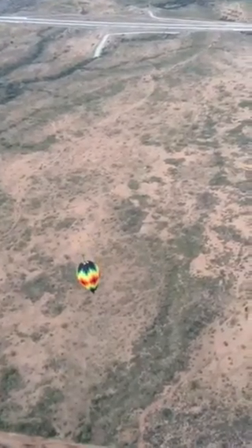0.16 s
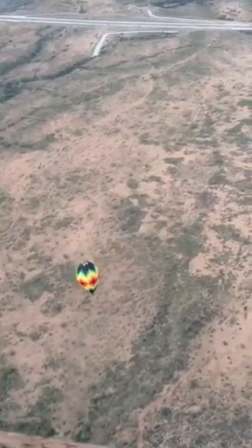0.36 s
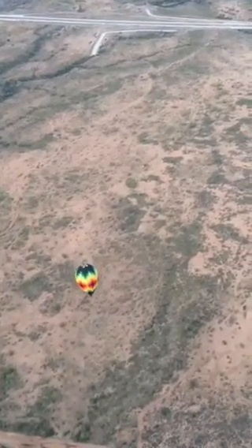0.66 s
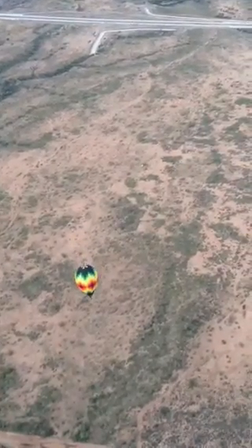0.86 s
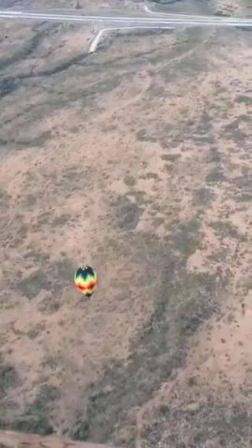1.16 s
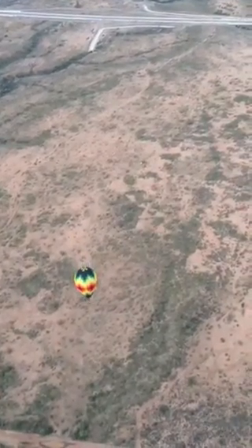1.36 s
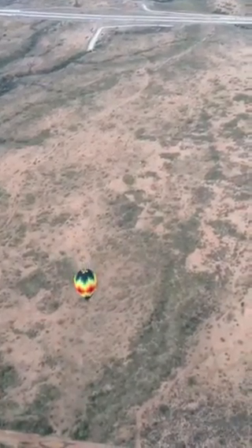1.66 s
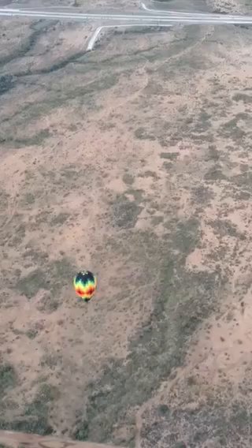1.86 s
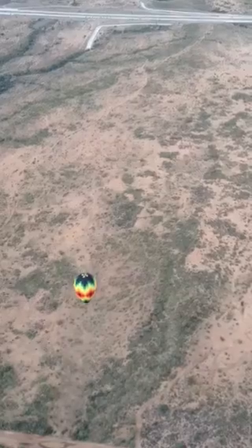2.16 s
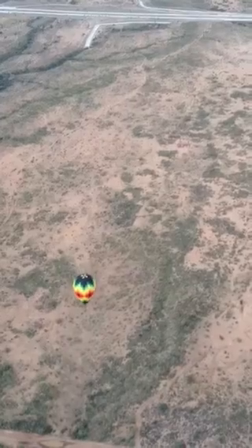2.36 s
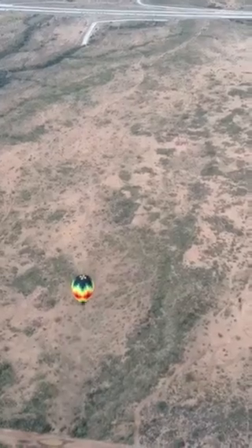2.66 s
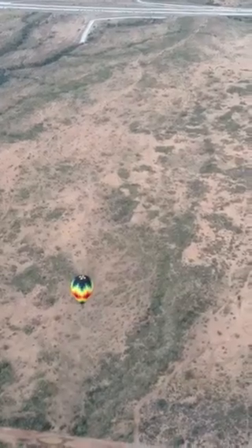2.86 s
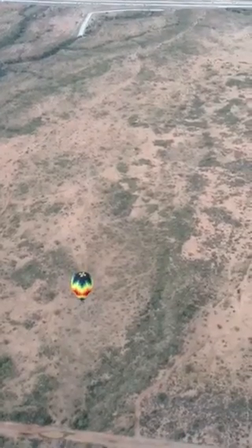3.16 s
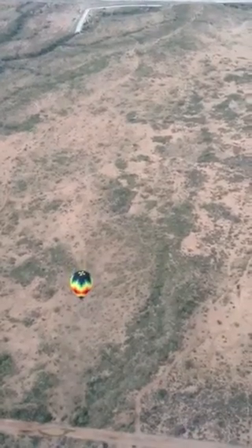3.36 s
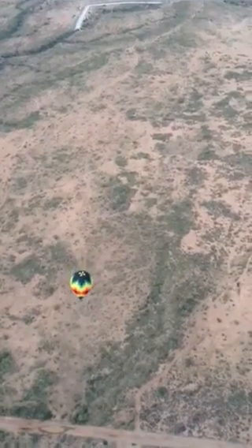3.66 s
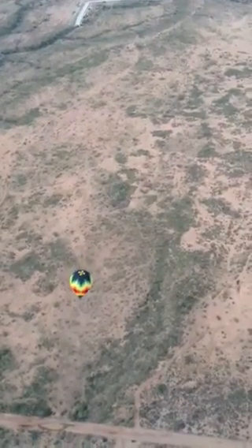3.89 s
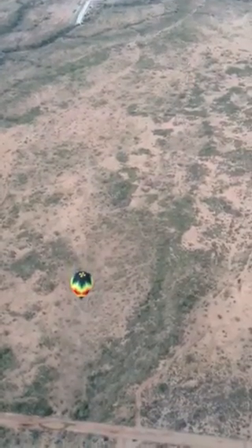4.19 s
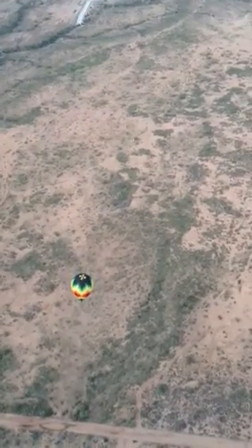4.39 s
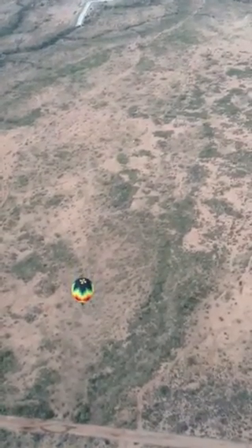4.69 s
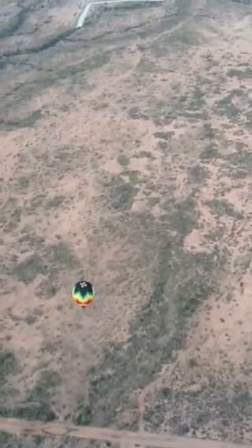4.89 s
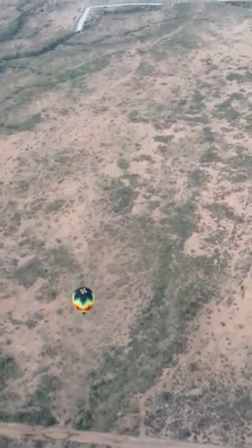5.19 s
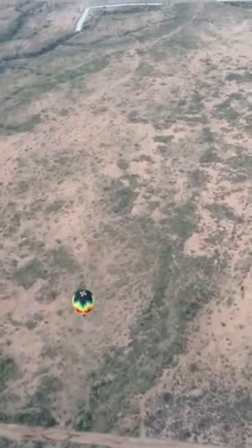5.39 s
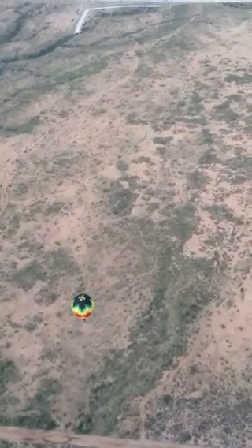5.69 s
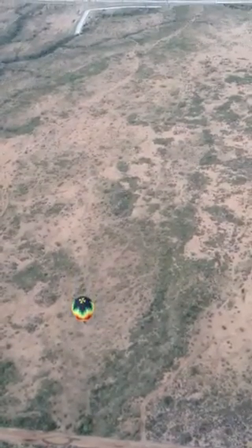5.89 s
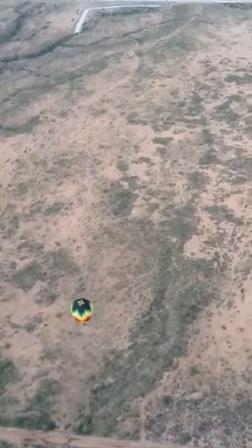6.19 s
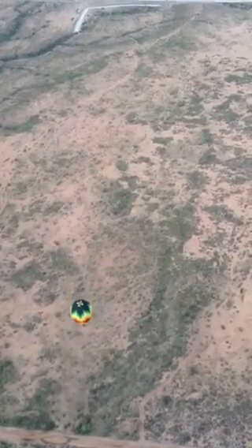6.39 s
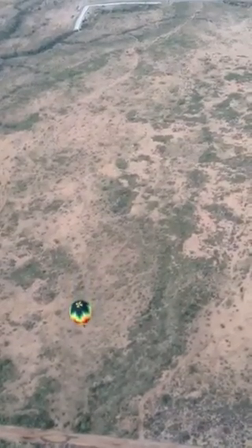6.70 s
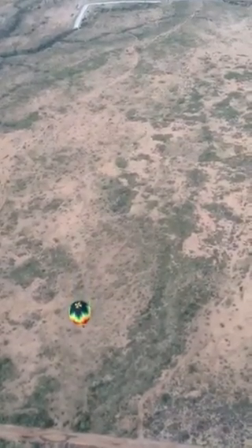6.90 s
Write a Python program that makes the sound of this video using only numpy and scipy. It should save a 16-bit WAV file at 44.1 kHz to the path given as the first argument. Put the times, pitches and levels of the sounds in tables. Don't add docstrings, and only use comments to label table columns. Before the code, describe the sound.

A faint pilot flame flutters, then a balloon burner thumps alight and roars with tearing gas hiss for three seconds before cutting off abruptly.

```python
import sys
import numpy as np
from scipy import signal
from scipy.fft import rfft, irfft
from scipy.io import wavfile
from scipy.ndimage import uniform_filter1d

SR = 44100
rng = np.random.default_rng(int(sys.argv[2]) if len(sys.argv) > 2 else 0)


def how_loud(loudness_db):
    steps = np.asarray(loudness_db, float) / 20
    return 10 ** steps


def to_wav(sig):
    pcm = np.clip(np.atleast_2d(sig), -1, 1) * 32767
    pcm = np.round(pcm).astype(np.int16)
    wavfile.write(sys.argv[1], SR, pcm.T)


N = 310766

# time_s, firing_hz, level_db, late_timbre_share
ENGINE_GLIDE = [
    (0, 124.4, -75, 0),
    (1.5, 129.6, -67, 0),
    (1.9, 135.5, -67, 0.1),
    (2.1, 137, -61.5, 0),
    (2.35, 138.4, -63.5, 0.07),
    (2.6, 141, -63, 0),
    (5.8, 150, -58, 0.94),
    (6.4, 149.1, -57, 0.8),
    (7.05, 149, -60, .999),
]
# firing_rate_multiple, early_db, late_db
ENGINE_ORDERS = [(1, -10.5, -12), (2, 4, -0.5), (3, -20, -4), (3.5, -18.5, -13.5), (4, -1, -14),
                 (5, -13, -19)]

# freq_hz, density_db
CLOTH_COLOUR = [(120, -49), (300, -15), (700, -5), (1500, -8), (2500, -11), (4500, -8), (6000, -15),
                (8000, -14), (11000, -22), (15300, -25)]

# start_s, peak_db, thing_touched
TICKS = [(.1785, -44, "wicker"), (.329, -47, "tube"), (.553, -53, "strap"), (.573, -52, "strap"),
         (.855, -54, "wicker"), (1.14, -49, "wicker"), (1.198, -39.5, "clasp"), (1.716, -48, "wicker"),
         (2.1, -50, "cane"), (5.841, -51, "lever"), (5.853, -52, "lever"), (6.445, -56, "wicker"),
         (6.635, -53, "wicker"), (6.804, -56, "wicker"), (6.898, -52.5, "cane"), (7.035, -55, "wicker")]
TOUCHED_RINGS = { "wicker": [(9000, 8000, 0, .027)], "cane": [(4400, 2000, 4, .017)],
                 "tube": [(1860, 117, 0, .1)], "strap": [(1250, 500, -1, .11), (1300, 900, -9, 0.78)],
                 "clasp": [(8000, 11000, -1, 0.054), (3760, 700, 2, .043), (4700, 500, -5, .044),
                 (2500, 500, -12, .03), (9700, 810, -13, .07), (3250, 200, -13, .14)],
                 "lever": [(10000, 9300, 3.5, 0.078), (3800, 250, -6, .12), (5700, 300, -8, .07),
                 (7700, 300, -8, .12), (10000, 400, -11, .09), (11900, 400, -9, .09),
                 (14500, 600, -8, .09)], }

# time_s, size_db, second_group_pitch_factor
PILOT_FLAME = [
    (0, 0, 1.001),
    (2.57, 0, 1.013),
    (5.75, -5.5, 0.99),
    (5.92, -3, 0.98),
    (6.1, -3, 0.93),
    (6.3, -1.5, 0.93),
    (6.47, -0.7, .93),
    (6.53, -2, 0.99),
    (7.05, -1.2, 1.005),
]
# level_db, size_share, db_per_unit_pitch
PILOT_LAYERS = [
    (-51.5, 1.3, -1),
    (-68, 1.2, 1),
    (-63, 0.905, 80),
    (-71.5, .8, 25),
]
# centre_hz, width_hz, level_db
TUBE_TONES = [
    [(1878, 140, 0.5), (2140, 150, -6)],
    [(3438, 110, -1), (3850, 340, 2), (4440, 98, -13.5)],
    [(5390, 180, 1), (6570, 300, -4), (7600, 720, 4.5), (9530, 250, -4), (11600, 820, 2.5),
     (12270, 500, -3), (13550, 600, -2), (14500, 1000, -2.5)],
]
# freq_hz, density_db
FLUTTER_COLOUR = [(30, -73.5), (55, -43), (80, -22.5), (110, -10), (160, -1.5), (210, -1.5), (260, -4.5),
                  (330, -7), (410, -14.5), (500, -12.5), (700, -13), (1080, -24.5), (1500, -38.5),
                  (2200, -61)]
# freq_hz, density_db
FIZZ_COLOUR = [(200, -59.5), (700, -21), (1500, -2), (2800, -2), (4600, -0.5), (6000, -6.5), (9000, -7.5),
               (10500, -11), (13000, -16), (15300, -13)]

# start_s, peak_db, low_bump_db, dip_after_db
SURGES = [(2.776, -12.5, -29, -1), (2.859, -8.5, -35, -1.5), (3.151, -12, -41.5, -0.5),
          (3.2163, -6.5, -26, -4), (3.49, -9, -34, -0.4), (3.62, -5.5, -38, -2.5), (3.752, -5, -43.5, -2),
          (3.964, -6, -39, -3), (4.45, -5, -38, -4), (4.734, -4.5, -39.5, -2), (5.173, -5, -41, 1.6),
          (5.275, -9, -38, -1.5)]
# start_s, peak_db, low_bump_db, pitch_hz, t60_s
POPS = [
    (2.5985, -30, -60, 300, .05),
    (2.6045, -16, -50, 480, .04),
    (2.6093, -9, -45, 470, .03),
    (2.6155, 0, -26, 232, .075),
    (5.687, -10, -70, 260, .04),
    (5.748, -32, -70, 240, .07),
    (5.77, -35, -70, 260, .04),
    (5.786, -37, -70, 200, .1),
    (5.82, -39, -70, 200, .2),
]

# time_s, gas_pressure_db, flame_size_db
VALVE = [
    (2.7, .5, 3.5),
    (3.05, 1.5, 1.5),
    (3.6, -0.5, -0.5),
    (3.9, 1.5, 0),
    (4.7, 2, -1),
    (5.1, -2, 1),
    (5.35, -6, .5),
    (5.58, -11.5, -0.5),
    (5.685, -20, -3),
]
# level_db, pressure_share, size_share, dip_share, shut_fall_db_per_s
BURNER_LAYERS = [
    (-17, 0.13, 0.97, 0.73, 225),
    (-28, 0.18, 0.79, 1.1, 284),
    (-29, 0.61, .05, .9, 380),
    (-22, 0.92, .05, 0.81, 440),
]
# freq_hz, density_db
FLAME_COLOUR = [(25, -69.5), (55, -50.5), (75, -38), (100, -18.5), (130, -10.5), (165, -0.5), (195, -1),
                (235, 1), (290, -3), (350, -6.5), (460, -11.5), (590, -10.5), (700, -22), (980, -41.5)]
UPPER_FLAME_COLOUR = [(410, -21.5), (700, -2), (907, 0), (1020, -3), (1290, 1), (1690, -9.5), (1900, -11.5),
                      (2470, -36), (4180, -120)]
LOWER_JET_COLOUR = [(1500, -22.5), (1750, -6.5), (2000, -5.5), (2600, -4), (3200, -6.5), (3700, -2.5),
                    (4300, -1), (5100, -3), (5550, -7.5), (6000, -23)]
JET_COLOUR = [(5200, -36.5), (5650, -9.5), (6300, -2.5), (6800, -3.5), (7500, 0.5), (9000, 0), (11200, 0),
              (13000, 0.5), (15300, -3.5), (16000, -5.5)]

# centre_s, low_hz, high_hz
SPLITS = [(1.3, 5700, 7000), (1.3, 9000, 10400), (3.37, 9600, 11200), (3.98, 13100, 15300),
          (4.3, 5700, 7000), (4.84, 4200, 5300), (4.84, 6900, 10500), (4.84, 13800, 15300),
          (4.863, 5200, 7700), (4.91, 9600, 11200), (4.91, 11700, 13200), (5.42, 6900, 8400),
          (5.465, 6300, 9100), (6.25, 7000, 8400), (6.25, 9000, 10500)]

OPEN_S, SHUT_S = 2.59, 5.685
SNAP_DB, SNAP_S = (-30, -39, -28, -15), 0.0086
SWELL_DB, SWELL_S = (-1.5, -2.5, -4.5, -14.5), 0.039


def evened(x):
    return x / np.sqrt(np.mean(x ** 2) + 1e-20)


def columns(table):
    time_s, *values = np.transpose(table)
    return [np.interp(np.arange(N) / SR, time_s, v) for v in values]


def add(mix, start_s, sound):
    part = mix[round(start_s * SR):][:len(sound)]
    part += sound[:len(part)]


def resonate(x, hz, width_hz):
    turn = np.exp(2j * np.pi * np.cumsum(hz * np.ones(len(x))) / SR)
    r = np.exp(-np.pi * width_hz / SR)
    return 2 * (turn * signal.lfilter([1 - r], [1, -r], x / turn)).real


def ringing_band(noise, hz, width_hz):
    return evened(resonate(resonate(noise, hz, width_hz), hz, width_hz))


def turbulence(colour, patchy_db, flicker_db, size=1024):
    frames = 4 * N // size + 5
    hz = np.fft.rfftfreq(size, 1 / SR)
    a, b, patches = rng.standard_normal((frames, len(hz), 3)).T
    patches = uniform_filter1d(patches, size=size // 100, axis=0)
    patches = evened(uniform_filter1d(patches, size=8, axis=1))
    flicker = evened(uniform_filter1d(rng.standard_normal(frames), size=3))
    colour_hz, density_db = np.transpose(colour)
    colour_db = np.interp(np.log(hz + 1), np.log(colour_hz + 1), density_db)[:, None]
    z = (a + 1j * b) * how_loud(colour_db + patchy_db * patches + flicker_db * flicker)
    return evened(signal.istft(z, nperseg=size, noverlap=3 * size // 4)[1][:N])


def engine():
    firing_hz, level_db, late = columns(ENGINE_GLIDE)
    turns = np.cumsum(firing_hz) / SR
    late = np.clip(late, 0, 1)
    out = np.zeros(N)
    for multiple, early_db, late_db in ENGINE_ORDERS:
        waver_db = 2.6 * evened(uniform_filter1d(rng.standard_normal(N), size=4000))
        order_db = level_db + early_db + late * (late_db - early_db) + waver_db
        out += how_loud(order_db) * np.sqrt(2) * np.sin(2 * np.pi * multiple * turns)
    return out


def sleeve():
    t = np.arange(N) / SR - 2.12
    hold_s, slope_db_per_s = 0.1, 250
    level_db = -58.5 - slope_db_per_s * (np.maximum(-t, 0) + np.maximum(t - hold_s, 0))
    return how_loud(level_db) * turbulence(CLOTH_COLOUR, patchy_db=1.5, flicker_db=2.0, size=512)


def ticks():
    out = np.zeros(N)
    t = np.arange(SR // 3) / SR
    attack = 1 - np.exp(-t / 0.00051)
    for start_s, peak_db, thing in TICKS:
        noise = rng.standard_normal(len(t))
        for hz, width_hz, part_db, t60_s in TOUCHED_RINGS[thing]:
            decay = how_loud(peak_db + part_db - 6.0 - 60 * t / t60_s)
            add(out, start_s, decay * attack * ringing_band(noise, hz, width_hz))
    return out


def pilot():
    size_db, pitch = columns(PILOT_FLAME)
    flutter_db, *tones_db = [db + share * size_db + sag_db * (pitch - 1)
                             for db, share, sag_db in PILOT_LAYERS]
    puffs = how_loud(evened(uniform_filter1d(rng.standard_normal(N), size=500)))
    sparks = (rng.random(N) < 18 / SR) * rng.uniform(.3, 1.3, N)
    crackle = signal.lfilter([1], [1, -.995], sparks)
    out = how_loud(flutter_db) * turbulence(FLUTTER_COLOUR, patchy_db=0.5, flicker_db=0.8, size=2048)
    for group, group_db, factor, spark in zip(TUBE_TONES, tones_db, (1, pitch, 1), (.3, .4, 1.1)):
        air = rng.standard_normal(N) * (puffs + spark * crackle)
        tones = sum(how_loud(db) * ringing_band(air, hz * factor, 1.5 * width_hz)
                    for hz, width_hz, db in group)
        out += how_loud(group_db) * evened(tones)
    fizz = turbulence(FIZZ_COLOUR, patchy_db=1.5, flicker_db=2.0, size=512)
    return out + how_loud(tones_db[-1] + 5.0) * fizz


def surges():
    rings, low_bumps = np.zeros(N), np.zeros(N)
    t = np.arange(SR // 5) / SR
    rise = 1 - np.exp(-t / .001)
    low_bump = np.e * t / .0025 * np.exp(-t / .0025)
    can_hz, can_t60_s = 220, .043
    thumps = [(*row[:3], can_hz, can_t60_s) for row in SURGES]
    for start_s, peak_db, bump_db, hz, t60_s in [*POPS, *thumps]:
        cycles = hz * (t - 3.4 * t ** 2 / (1 + 12 * t))
        add(rings, start_s, how_loud(peak_db - 60 * t / t60_s) * rise * np.sin(2 * np.pi * cycles))
        add(low_bumps, start_s, how_loud(bump_db) * low_bump)
    return low_bumps + signal.lfilter(*signal.butter(2, 70, "high", fs=SR), rings)


def surge_dips_db():
    t = np.arange(N) / SR
    delay_s, recover_s = .008, 0.099
    dip_db = np.zeros(N)
    for start_s, _, _, db in SURGES:
        since = t - start_s - delay_s
        dip_db += db * (since > 0) * np.exp(-abs(since) / recover_s)
    since_thump_s = t - 2.621
    return dip_db - 5 * (since_thump_s > 0) * np.exp(-abs(since_thump_s) / .03)


def layer_levels():
    t = np.arange(N) / SR
    pressure_db, size_db = columns(VALVE)
    dip_db = surge_dips_db()
    since, shut = np.maximum(t - OPEN_S, 0), np.maximum(t - SHUT_S, 0)
    drain_db = -21 - 90 * shut
    levels = []
    for layer, snap_db, swell_db in zip(BURNER_LAYERS, SNAP_DB, SWELL_DB):
        level_db, pressure_share, size_share, dip_share, fall_db_per_s = layer
        onset_db = snap_db * np.exp(-since / SNAP_S) + swell_db * np.exp(-(since / SWELL_S) ** 2)
        drive_db = pressure_share * pressure_db + size_share * size_db + dip_share * dip_db
        release_db = np.maximum(-fall_db_per_s * shut, drain_db)
        levels.append(level_db + onset_db + drive_db + release_db)
    return levels


def burner():
    flame_db, upper_db, lower_db, jet_db = layer_levels()
    t = np.arange(N) / SR
    valve = np.clip((t - OPEN_S) / 0.0049, 0, 1)
    alight = np.clip((t - 2.612) / .11, 0, 1)
    flame = alight * how_loud(flame_db) * turbulence(FLAME_COLOUR, patchy_db=0.5, flicker_db=0.24, size=2048)
    flame += how_loud(upper_db + 0.23) * turbulence(UPPER_FLAME_COLOUR, patchy_db=-0.5, flicker_db=0.8)
    jet = how_loud(lower_db + 0.66) * turbulence(LOWER_JET_COLOUR, patchy_db=1.14, flicker_db=-0.04, size=512)
    jet += how_loud(jet_db + 0.62) * turbulence(JET_COLOUR, patchy_db=1.04, flicker_db=0.35, size=512)
    dull = np.clip((t - SHUT_S + 0.082) / 0.14, 0, 1)
    dulled_jet = signal.lfilter(*signal.butter(1, 8000, fs=SR), jet)
    jet += dull * (dulled_jet - jet)
    return how_loud(2) * valve * (flame + jet)


def scene():
    mono = engine() + sleeve() + ticks() + pilot() + surges() + burner()
    return np.tile(mono, (2, 1))


def limited(x):
    level_db = 20 * np.log10(abs(x) + 1e-9)
    rise_db = np.arange(N) * 15.6 / SR
    held_db = np.maximum.accumulate(level_db + rise_db) - rise_db
    over_db = np.maximum(held_db + 3.0, 0)
    return x / how_loud(0.84 * uniform_filter1d(over_db, size=40))


def thinned(x):
    hz, _, z = signal.stft(x, SR, "cosine", nperseg=2048, noverlap=1024)
    power = abs(z) ** 2
    limit = how_loud(-9.5 + .26 * hz[:, None] / 1000) ** 2
    nearby, wide = uniform_filter1d(power, size=8, axis=0), uniform_filter1d(power, size=150, axis=0)
    weak = nearby < limit * wide
    weak = uniform_filter1d(weak * 1., size=5, axis=0) > .01
    kept = z * ~(weak & (hz[:, None] > 6500))
    return signal.istft(kept, SR, "cosine", nperseg=2048, noverlap=1024)[1][:N]


def treble_side(mid):
    side = np.zeros(N)
    window = signal.windows.cosine(2048) ** 2
    hz = np.fft.rfftfreq(2048, 1 / SR)
    for centre_s, low_hz, high_hz in SPLITS:
        start = round(centre_s * SR) - 1024
        band = abs(rfft(mid[start:start + 2048])) * (hz > low_hz) * (hz < high_hz)
        scattered = irfft(band * np.exp(2j * np.pi * rng.random(len(hz))))
        add(side, start / SR, how_loud(-2.5) * window * scattered)
    return side


def band_limit(x):
    return signal.sosfilt(signal.butter(12, 15950, fs=SR, output="sos"), x)


def record(dry):
    mid = thinned(limited(dry[0]))
    top_cut = signal.firwin(1601, 15280, window=("kaiser", 9), fs=SR)
    mid = signal.oaconvolve(mid, top_cut, "same")
    mid = signal.lfilter(*signal.butter(1, 30, "high", fs=SR), mid)
    side = treble_side(mid)
    return band_limit(np.array([mid + side, mid - side]))


dry = scene()
out = record(dry)
to_wav(out)
```